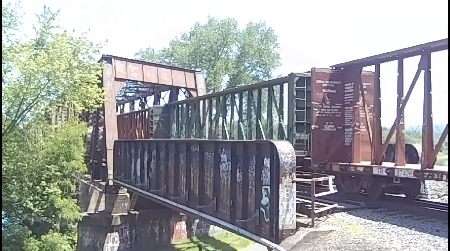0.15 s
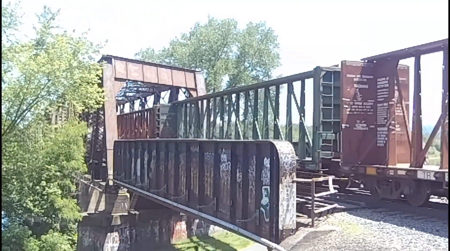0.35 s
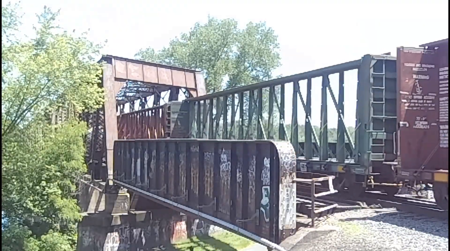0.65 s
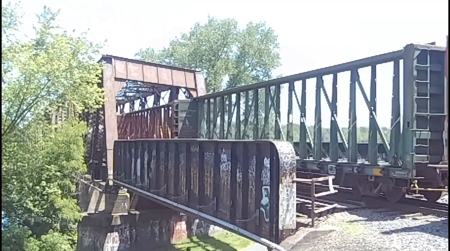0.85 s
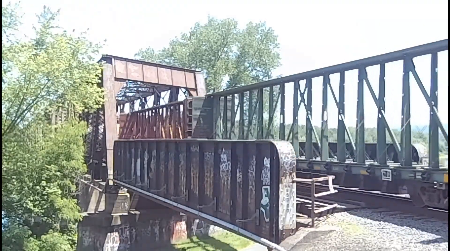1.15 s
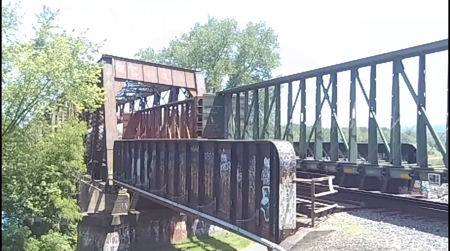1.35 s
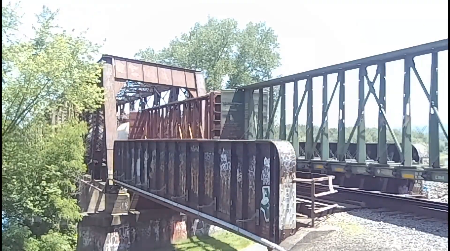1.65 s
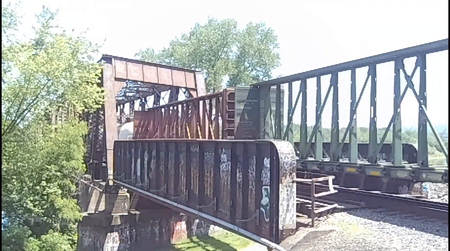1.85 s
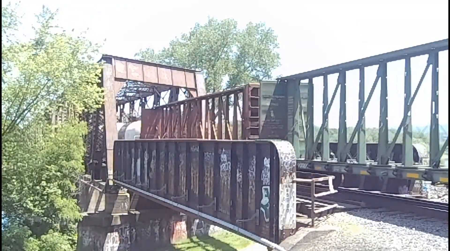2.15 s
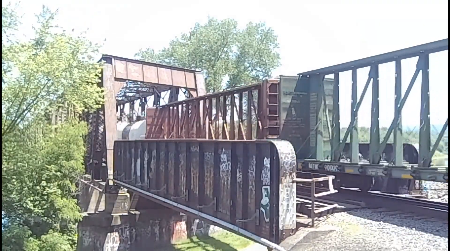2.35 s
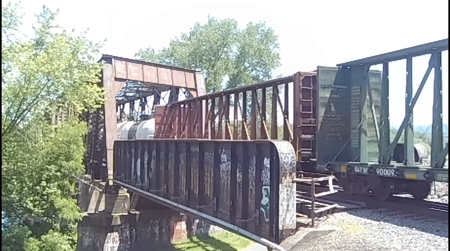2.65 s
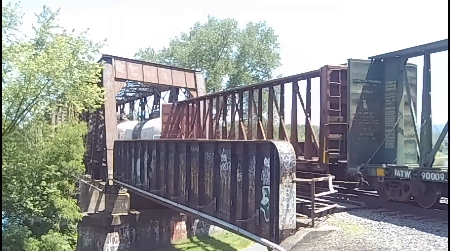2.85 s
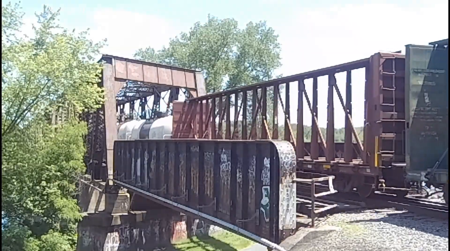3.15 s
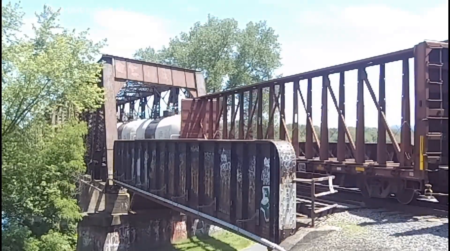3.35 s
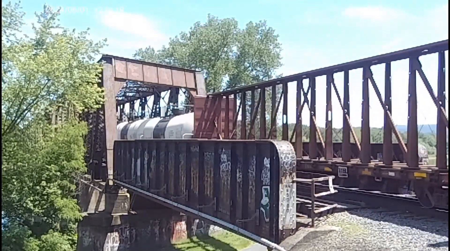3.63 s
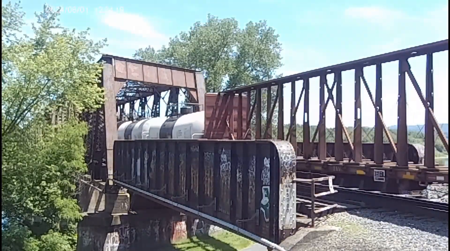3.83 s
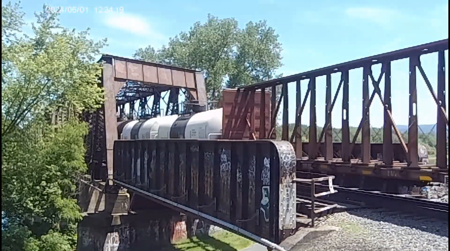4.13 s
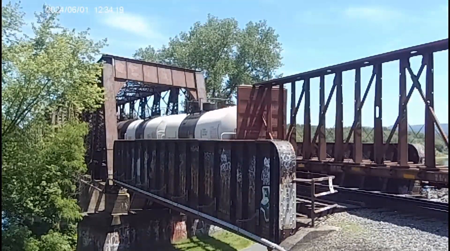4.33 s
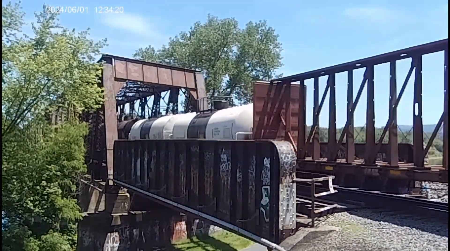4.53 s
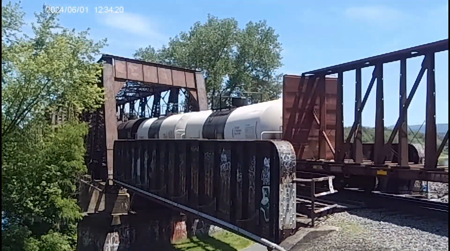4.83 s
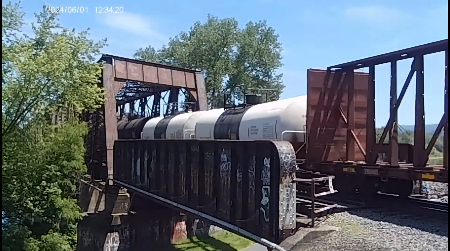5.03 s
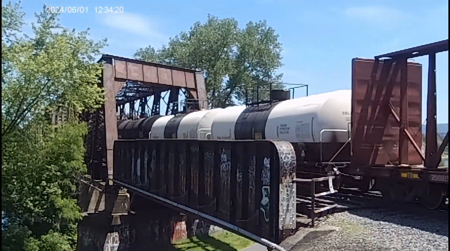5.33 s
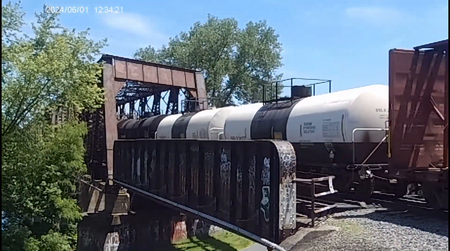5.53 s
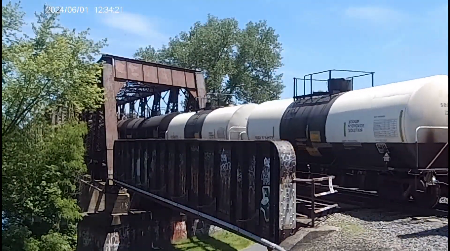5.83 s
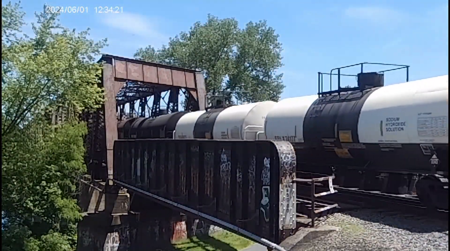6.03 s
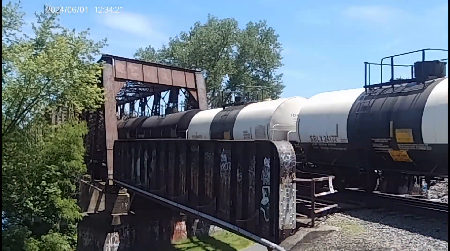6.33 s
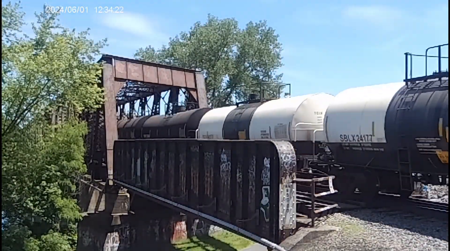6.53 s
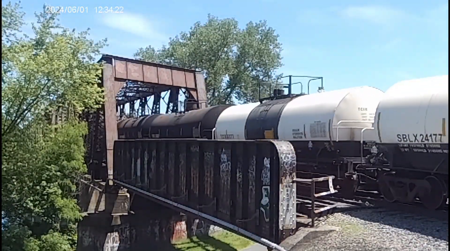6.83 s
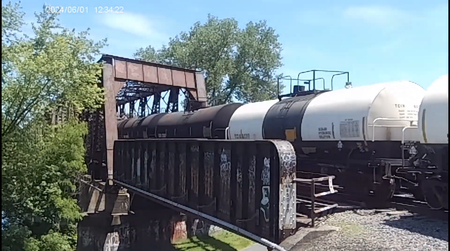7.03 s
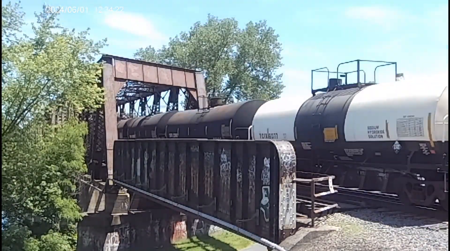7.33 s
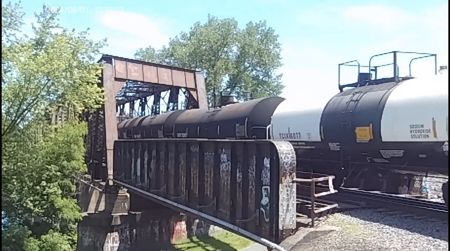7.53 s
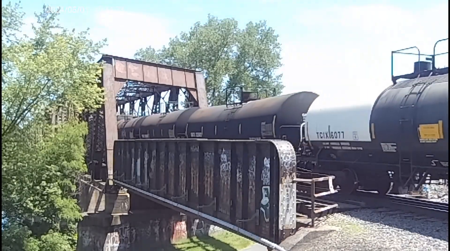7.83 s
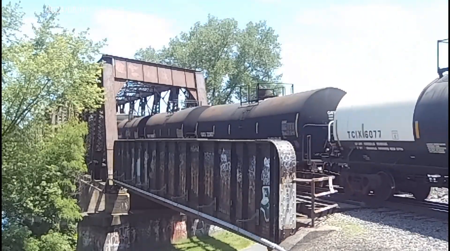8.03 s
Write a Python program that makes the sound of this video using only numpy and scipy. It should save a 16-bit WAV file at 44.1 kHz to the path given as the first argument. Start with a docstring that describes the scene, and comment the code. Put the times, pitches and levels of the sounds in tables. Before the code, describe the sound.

Beside the track outdoors, one microphone hears a long freight train cross a steel girder bridge at a steady pace. A continuous low boom and mid-low roar fill the sound, throbbing with each wheel turn. Hard clacks and deck thuds crowd together from about two and a half to four and a half seconds, then thin out. Faint scraping, short squeaks and loose metal clanks ride on top as the rumble eases.

```python
"""Freight train on a steel girder bridge

A train rolls at a steady pace across the span, heard from beside the track on one microphone.
Filtered noise makes the roar of rough wheels; slow swings boom in the girders and panels drone.
Short filtered blows knock in rail and deck, once a turn under wheels with flat spots.
Bogies lean on the rail: scrape and hiss swell, wheel modes sing and squeak; loose fittings clank."""
import sys
import numpy as np
from scipy import signal
from scipy.fft import rfft, irfft
from scipy.io import wavfile
from scipy.ndimage import uniform_filter1d, minimum_filter1d, map_coordinates

SR = 44100
rng = np.random.default_rng(int(sys.argv[2]) if len(sys.argv) > 2 else 0)


def to_wav(s):
    """Save 16-bit WAV."""
    ch = np.atleast_2d(s).T  # columns
    pcm = np.round(np.clip(ch, -1, 1) * 32767)  # PCM
    wavfile.write(sys.argv[1], SR, pcm.astype(np.int16))


N = 360738  # length in samples


def amp(db):
    """Gain of a level in dB."""
    return 10 ** (np.asarray(db) / 20)


def unit(x):
    """x at rms 1."""
    return x / np.sqrt(np.mean(x ** 2) + 1e-20)


def curves(rows):
    """One value per sample for each column after the time."""
    s, *cols = np.transpose(rows)
    return [np.interp(np.arange(N) / SR, s, c) for c in cols]


def wobble(rate):
    """A smooth random curve, rate knots a second."""
    knots = rng.standard_normal(int(N * rate / SR) + 4)
    return map_coordinates(knots, [np.arange(N) * rate / SR], mode="nearest")


def flutter(n, rate):
    """n samples of a tone's random swing in level and phase, rate knots a second; rms 1."""
    at = [np.arange(n) * rate / SR]
    real, imag = [map_coordinates(knots, at, mode="nearest") for knots in rng.standard_normal((2, 1000))]
    return (real + 1j * imag) / np.sqrt(np.mean(real ** 2 + imag ** 2))


def add(track, s, sound):
    """Mix a sound into a track from time s on."""
    start = int(np.clip(round(s * SR), 0, N))
    track[start:start + len(sound)] += sound[:N - start]


def body(spectrum, modes=(), size=8192):
    """Causal impulse response of energy 1: a broad spectrum with resonances standing on it."""
    hz = np.fft.rfftfreq(size, 1 / SR)
    f, level = np.transpose(spectrum)
    beyond_db = -60 * np.log10(np.maximum(hz / f[-1], 1))  # steep fall above the last row
    db = np.interp(np.log(hz + 1), np.log(f), level) + beyond_db
    for centre, width, lift in modes:
        db = db + lift / (1 + (2 * (hz - centre) / width) ** 2)
    # folding the cepstrum gives minimum phase: the response starts at once
    cepstrum = irfft(np.log(amp(db)))
    cepstrum[1:size // 2] *= 2
    cepstrum[size // 2 + 1:] = 0
    response = irfft(np.exp(rfft(cepstrum)))
    return response / np.linalg.norm(response)


def rolling(response, bumps_per_s, bump_share):
    """Fine roughness plus countless small bumps of the treads shake a body; rms 1."""
    n = N + len(response) - 1
    bumps = (rng.random(n) < bumps_per_s / SR) * rng.standard_normal(n)
    roughness = rng.standard_normal(n)
    return unit(signal.fftconvolve(bump_share * unit(bumps) + roughness, response, "valid"))


def steady(x, seconds):
    """Even out the swells of x that last longer than the given time."""
    size = max(int(seconds * SR), 2)
    power = uniform_filter1d(uniform_filter1d(x ** 2, size), size)
    return x / np.sqrt(np.abs(power) + 1e-9)


def patches(x, patchy_db, width_hz, seconds):
    """Wheel after wheel excites other resonances: the colour of x shifts in patches of this width and life."""
    z = signal.stft(x, nperseg=2048)[2]
    bins = max(width_hz * 2048 / SR, 1)
    frames = max(seconds * SR / 1024, 1)
    row, col = np.indices(z.shape)
    field = map_coordinates(rng.standard_normal(z.shape), [row / bins, col / frames], order=1)
    return unit(signal.istft(z * amp(patchy_db * unit(field)), nperseg=2048)[1][:N])


REBOUND_S, REBOUND_DB = .0065, -5  # typical delay and level of the second touch


def blow(response, t60, chatter_db, tail_db, tail_t60):
    """A hard contact and its rebound, brief chatter, then echo through the steelwork; rms 1 over 20 ms."""
    t = np.arange(SR // 3) / SR
    fade = np.exp(-np.log(1000) * t / t60)
    fade = fade + amp(tail_db) * np.exp(-np.log(1000) * t / tail_t60)
    rise = 1 - np.exp(-t / REBOUND_S)
    chatter = signal.fftconvolve(rise * fade * rng.standard_normal(len(t)), response)
    sound = amp(chatter_db) * chatter / np.linalg.norm(chatter)
    sound[:len(response)] += response
    rebound = int(REBOUND_S * SR * rng.uniform(.8, 1.3))
    sound[rebound:][:len(response)] += amp(REBOUND_DB) * response
    return sound / np.std(sound[:SR // 50])


# Deck and rails as cars pass the microphone. Each row: time in seconds, base level in dB of the
# deck rumble, base level in dB of the rail roar.
ROAR_LEVELS = [(0, -20, -26.5), (1, -16.5, -26.5), (2, -16, -25.5), (2.5, -14.5, -24.5), (2.75, -16, -22.5),
               (3.6, -15.5, -23), (4.4, -16.5, -24.5), (5.3, -18.5, -26.5), (5.8, -19, -27),
               (6.8, -20.5, -28), (7.5, -22, -28), (8.18, -24, -27)]
# Girders under the passing axles. Each row: time in seconds, base level of the boom in dB.
BOOM_LEVELS = [(0, -17), (0.7, -18), (1.3, -18.5), (1.65, -17.5), (2.5, -18.5), (2.75, -20.5), (4.1, -18),
               (4.7, -21), (5.9, -21), (6.4, -20.5), (8.18, -21.5)]
# Spectra of the girders, deck and rails. Each row: frequency in Hz, relative density in dB per Hz.
GIRDER_SPECTRUM = [(10, -24), (22, -15.5), (33, -10.5), (44, -4), (54, -1.5), (68, -4), (90, -6),
                   (115, -14), (200, -48.5)]
DECK_SPECTRUM = [(70, -29.5), (105, -5), (140, 0.5), (180, -0.7), (250, -3.5), (340, -5.5), (450, -6.5),
                 (560, -14.5), (900, -50)]
RAIL_SPECTRUM = [(250, -20.5), (400, -3), (480, 0), (640, -0.5), (740, 0), (900, -4), (1030, -9.5),
                 (1200, -16), (1400, -29), (1900, -33), (2600, -56.5)]
# Plate resonances. Each row: frequency in Hz, width in Hz, lift above the spectrum in dB.
PLATE_MODES = [(140, 47, 2.5), (291.7, 20, 2), (441.5, 7.3, 2), (566.5, 13, 2.5), (690, 20, 1)]
# out-of-round wheels: one turn, a moment of full load, swing of the rail roar either way
TURN_S, THROB_AT_S, THROB_DB = .288, 3.12, 1.5


def bridge():
    """Girders boom under axle load; deck and rails roar with wheel roughness and throb once a turn."""
    boom_db, deck_db, rail_db = curves(BOOM_LEVELS) + curves(ROAR_LEVELS)
    throb_db = THROB_DB * np.cos(2 * np.pi * (np.arange(N) / SR - THROB_AT_S) / TURN_S)
    dip_db = uniform_filter1d(lift_db(), size=256)

    boom = rolling(body(GIRDER_SPECTRUM), 60, bump_share=0.52)
    boom = amp(boom_db + 0.1 + 1.3 * wobble(16)) * steady(boom, seconds=0.064)

    deck = rolling(body(DECK_SPECTRUM, PLATE_MODES), 900, bump_share=0.25)
    deck = patches(deck, patchy_db=1.1, width_hz=30, seconds=.09)
    deck_db = deck_db + dip_db + 0.66 * throb_db + 0.4 * wobble(18)
    deck = amp(deck_db) * steady(deck, seconds=0.071)

    rail = rolling(body(RAIL_SPECTRUM, PLATE_MODES), 600, bump_share=0.3)
    rail = patches(rail, patchy_db=1.3, width_hz=61.7, seconds=.08)
    rail_db = rail_db + 0.56 + dip_db + throb_db + 0.53 * wobble(16)
    rail = amp(rail_db) * steady(rail, seconds=0.1)
    return boom + deck + rail


# Heavy bogies out on the span. Each row: middle in seconds, pitch in Hz, peak in dB before HEAVE_DB.
HEAVES = [(.06, 56.2, -13), (.34, 59.5, -9), (0.559, 58, -9.5), (.74, 56.5, -11), (0.911, 53.8, -12.5),
          (1.47, 54.8, -12.5), (1.8, 61.8, -8), (2.28, 50.4, -11), (2.37, 55, -10.5), (2.55, 55.5, -7),
          (4.04, 55.2, -15), (4.88, 46.7, -13.5), (5.67, 51.7, -13), (6.36, 57, -17), (6.649, 53.5, -11),
          (6.87, 51, -17), (7.26, 59.1, -11), (7.81, 47.8, -10), (8.02, 58.6, -18)]
HEAVE_S, HEAVE_DB = 0.161, -3.2  # whole length of a swing; level added to all swings


def heaves():
    """A heavy bogie bends a girder: it swings for a few cycles and settles."""
    track, t = np.zeros(N), np.arange(int(HEAVE_S * SR)) / SR
    for s, hz, db in HEAVES:
        swing = np.sin(2 * np.pi * (hz * t + rng.random()))
        add(track, s - HEAVE_S / 2, amp(db + HEAVE_DB) * np.hanning(len(t)) * swing)
    return track


# Steel panels that a passing car sets droning. Each row: middle in seconds, length in seconds
# between the half-height points of the swell, pitch in Hz, level in dB (rms before the swell shapes it).
DRONES = [(0.88, .3, 215, -21), (1.65, 0.51, 100, -21.5), (1.698, 0.38, 305, -20.5),
          (2.53, 0.29, 136.4, -18.5), (3.298, .4, 220.7, -19), (3.42, 0.52, 454, -24),
          (3.746, 0.28, 206.5, -23), (4.202, 0.36, 279, -23), (4.599, 0.37, 222, -21), (5.6, .5, 245, -25),
          (8.05, .4, 145, -24.5)]
DRONE_WIDTH_HZ = 40  # random knots a second, which broaden the tone


def drones():
    """Each car shakes other panels: a broad low resonance swells as it passes and fades."""
    track = np.zeros(N)
    for s, length, hz, db in DRONES:
        n = int(2 * length * SR)
        swing = flutter(n, DRONE_WIDTH_HZ) * np.exp(2j * np.pi * hz * np.arange(n) / SR)
        add(track, s - length, amp(db) * np.hanning(n) * unit(swing.real))
    return track


# Hard knocks, where a flat spot lands squarely or a wheel meets a joint. Each row: time in seconds,
# clack level in dB before CLACK_DB, clack pitch in Hz, thud level in dB before THUD_DB.
KNOCKS = [(0.194, -13.5, 717, -24.5), (0.287, -15.5, 742, -24), (0.777, -15, 676, -18.5),
          (1.059, -9, 806, -9), (1.149, -13, 625, -21), (1.531, -9, 944, -13), (1.64, -9, 834, -13),
          (1.712, -9.5, 743, -13), (1.819, -13, 700, -18), (1.879, -12, 710, -23), (2.116, -13, 755, -17),
          (2.253, -10.5, 777, -18), (2.398, -9.5, 756, -11), (2.5, -9.5, 727, -15), (2.784, -5.5, 753, -14),
          (2.819, -12, 710, -15), (2.89, -13, 783, -15), (2.98, -11, 700, -16), (3.031, -12, 763, -12.5),
          (3.059, -8, 856, -9.5), (3.106, -10, 760, -15), (3.277, -7, 740, -11.5), (3.461, -15.5, 680, -17),
          (3.571, -6.5, 853, -11.5), (3.651, -8.5, 710, -6.5), (3.768, -12.5, 716, -13),
          (3.868, -12, 726, -14.5), (4.008, -10, 874, -8), (4.072, -15.5, 696, -23),
          (4.164, -14, 850, -19.5), (4.244, -9.5, 600, -8.5), (4.3, -13, 640, -8.5),
          (4.578, -12, 840, -8.5), (4.754, -20, 703, -22), (5.106, -17.5, 725, -25), (5.433, -11, 732, -20),
          (5.486, -20, 746, -19), (6.011, -18, 740, -23), (6.775, -17.5, 640, -25), (7.468, -11, 817, -25),
          (7.763, -19, 757, -19)]
# Spectra of struck rail and thudding deck. Each row: frequency in Hz, relative density in dB per Hz.
KNOCK_SPECTRUM = [(200, -27), (500, 2.5), (750, 5), (950, -1), (1150, -10.5), (1400, -21), (1650, -16),
                  (2100, -31.5), (3300, -41.5), (5000, -59.5), (10000, -81)]
THUD_SPECTRUM = [(50, -11.5), (130, -9), (300, 0.5), (480, 2.5), (800, -17.5), (2000, -67)]
# Struck-rail resonances, before the pitch of each blow scales them. Each row: frequency in Hz,
# width in Hz, lift above the spectrum in dB.
RAIL_MODES = [(596, 48, 3.5), (810, 45, 6), (890, 90, 5)]
CLATTER_HZ, CLATTER_WIDTH_HZ = 1450, 980  # band in which the steelwork clatters after a hard blow
CLATTER_FROM_DB, CLATTER_GROWS = -13.5, 0.53  # clack level where it starts; dB of lift per dB above
CLACK_DB, THUD_DB = -9, -6  # levels added to all clacks in the rail and all thuds in the deck


def knocks():
    """Each blow clacks in the rail, pitched by where it lands and brighter when hard, and thuds in the deck."""
    track, deck = np.zeros(N), body(THUD_SPECTRUM, PLATE_MODES)
    for s, db, clack_hz, thud_db in list(KNOCKS) + flat_blows():
        place = clack_hz / RAIL_MODES[1][0]
        clatter = (CLATTER_HZ, CLATTER_WIDTH_HZ, CLATTER_GROWS * max(db - CLATTER_FROM_DB, 0))
        modes = [clatter] + [(hz * place, width, lift) for hz, width, lift in RAIL_MODES]
        rail = body(KNOCK_SPECTRUM, modes)
        clack = blow(rail, t60=0.18, chatter_db=1.0, tail_db=-13.0, tail_t60=0.23)
        thud = blow(deck, t60=0.14, chatter_db=0.5, tail_db=-12.0, tail_t60=0.3)
        add(track, s, amp(db + CLACK_DB) * clack)
        add(track, s, amp(thud_db + THUD_DB) * thud)
    return track


# Wheels with a flat spot. Each row: nearest blow in seconds, seconds per turn, clack level in dB
# there, before scatter and CLACK_DB.
FLAT_WHEELS = [(2.203, .288, -18.5), (2.982, .2929, -18), (3.422, .2875, -18.5), (4.275, .2935, -18.5),
               (6.526, .2875, -29.5)]
SPEED_M_PER_S, DISTANCE_M, SOUND_M_PER_S = 10, 20, 343  # train; microphone to track; sound in air
FLAT_FADE_DB_PER_M, FLAT_SCATTER_DB = 0.1, 1.2  # loss along the track; change from turn to turn
FLAT_HZ, FLAT_THUD_DB = 771, -2  # typical clack pitch; thud against clack, before the overall levels


def flat_blows(count=8):
    """Knock rows for the turns of each flat spot: later and fainter the farther along the track."""
    turns = np.arange(-count, count + 1)
    hard_s = np.array(KNOCKS)[:, 0]
    blows = []
    for s, turn_s, db in FLAT_WHEELS:
        along_m = SPEED_M_PER_S * turn_s * turns
        delay_s = (np.hypot(DISTANCE_M, along_m) - DISTANCE_M) / SOUND_M_PER_S
        scatter_db = FLAT_SCATTER_DB * rng.standard_normal(len(turns))
        level_db = db - FLAT_FADE_DB_PER_M * np.abs(along_m) + scatter_db
        clack_hz = FLAT_HZ * amp(0.74 * rng.standard_normal(len(turns)))
        blows += zip(s + turn_s * turns + delay_s, level_db, clack_hz, level_db + FLAT_THUD_DB)
    # a hard knock within 35 ms takes the place of the lighter one
    return [row for row in blows if 0 < row[0] < N / SR and np.abs(hard_s - row[0]).min() > .035]


LIFT_S, LIFT_DB = .025, 2.5  # length and depth of one dip, before smoothing


def lift_db():
    """The wheel is unloaded just before each hard knock, so the roar dips briefly."""
    t = np.arange(N) / SR
    return -LIFT_DB * sum(np.abs(t - (s - LIFT_S / 2)) < LIFT_S / 2 for s, *_ in KNOCKS)


# Treble of steel on steel. Each row: time in seconds, base level of the fine hiss in dB.
HISS_LEVELS = [(0, -81), (1.2, -77.5), (2.3, -72.5), (3.5, -76), (4.2, -71), (4.9, -76.5), (7.5, -81.5),
               (8.1, -74)]
# Spectra of wheel discs, scraping flanges and fine hiss. Each row: frequency in Hz, relative
# density in dB per Hz.
WEB_SPECTRUM = [(900, -32.5), (1300, -5.5), (1560, -3), (1800, -7), (1950, -13.5), (2150, -27),
                (3000, -40.5)]
SCRAPE_SPECTRUM = [(1600, -20.5), (2100, -9.5), (2650, 2.5), (2900, -2.5), (3350, -2), (3700, -8),
                   (4300, -17), (5100, -32), (6000, -40), (9000, -58.5)]
SIZZLE_SPECTRUM = [(3000, -10.5), (5000, -2), (5800, -6), (6400, 5), (7100, 0), (7800, 3.5), (9200, -3.5),
                   (10200, -16), (15000, -23)]
# Wheel-disc resonances. Each row: frequency in Hz, width in Hz, lift above the spectrum in dB.
WHEEL_MODES = [(1553, 100, 4.8), (2300, 21, 1), (3217, 120, 5.1), (3420, 160, 2.7), (4660, 210, 6.1),
               (5030, 230, 9.7), (6570, 320, 8.6), (7300, 300, 5.3)]
SCRAPE_DB, RING_DB = -56, -43.5  # base levels of flanges and wheel discs when running free
HISS_FOLLOWS, HISS_FLICKER_DB = 0.49, 1.5  # share of a rub's scrape rise; quick unevenness


def wheels():
    """Wheel discs ring in their modes while flanges scrape and hiss along the rail; rubs change all three."""
    scrape_db, ring_db = rub_db()
    hiss_db, = curves(HISS_LEVELS)
    ring = rolling(body(WEB_SPECTRUM, WHEEL_MODES), 600, bump_share=0.62)
    ring = patches(ring, patchy_db=3.0, width_hz=90.2, seconds=.08)
    scrape = rolling(body(SCRAPE_SPECTRUM, WHEEL_MODES), 600, bump_share=0.39)
    scrape = patches(scrape, patchy_db=3.5, width_hz=80, seconds=.08)
    hiss = rolling(body(SIZZLE_SPECTRUM), 600, bump_share=.3)
    hiss = patches(hiss, patchy_db=4.5, width_hz=92, seconds=0.065)
    hiss_db = hiss_db + HISS_FOLLOWS * scrape_db + HISS_FLICKER_DB * wobble(45)
    pressure_db = 1.4 * wobble(17)  # the wheelsets hunt from side to side
    mix = amp(RING_DB + ring_db) * ring + amp(SCRAPE_DB + scrape_db) * scrape + amp(hiss_db) * hiss
    return amp(pressure_db) * mix


# Bogies leaning on the rail. Each row: middle in seconds, length in seconds between the half-height
# points, rise of the scrape in dB, rise of the wheel ring in dB (negative where it falls).
RUBS = [(0.35, 0.18, 1.5, 2.5), (1.051, 0.24, 3, 4.5), (1.502, 0.19, 0.5, 3), (2.247, 0.53, 3.5, -1.5),
        (2.93, 0.4, 5, 3), (3.614, 0.25, 1.5, 2), (3.99, 0.53, 4, 2), (4.6, 0.39, 2, -1),
        (5.28, 0.31, 2.5, 1), (6.433, 0.28, 4, 2.5), (7.098, 0.57, 2, 0), (7.96, 0.69, 2, 3)]


def rub_db():
    """Rise of the scrape and of the wheel ring in dB: each leaning bogie swells and lets go."""
    t = np.arange(N) / SR
    return sum(np.outer([scrape_db, ring_db], np.exp(-np.log(2) * (2 * (t - s) / length) ** 2))
               for s, length, scrape_db, ring_db in RUBS)


# Modes that the flanges keep singing. Each row: central pitch in Hz, level in dB before SINGING_DB.
SINGING_MODES = [(1545, -1.5), (1610, -2.5), (2205, -11), (2345, -12), (2620, -11.5), (3060, -11.5),
                 (3300, -13), (3920, -20), (4150, -21), (4470, -21), (5040, -22.5), (5200, -23.5),
                 (5430, -30), (5690, -28.5), (6130, -26)]
SINGING_DB, SINGING_FOLLOWS = -53, 0.31  # level added when running free; share of a rub's scrape rise


def singing():
    """Rubbing feeds each wheel mode on its own: it swells, wanders in pitch from wheel to wheel and dies away."""
    track = np.zeros(N)
    for hz, db in SINGING_MODES:
        pitch_hz = hz * (1 + .007 * wobble(7)) + 32 * wobble(160)
        phase = 2 * np.pi * np.cumsum(pitch_hz) / SR
        swell_db = 5 * np.clip(wobble(13), -2, 1) + 4.4 * wobble(90) + 2.8 * np.clip(wobble(2.7), -2, 1)
        track += amp(db) * unit(amp(swell_db)) * np.sin(phase)
    return amp(SINGING_DB + SINGING_FOLLOWS * rub_db()[0]) * track


# Flange squeaks. Each row: middle in seconds, half of the whole span in seconds, pitch in Hz at the
# middle, level in dB, roughness from 0 to 1.
SQUEAKS = [(0.35, .04, 3015, -47, .6), (0.426, .045, 2410, -44, .7), (0.58, 0.099, 5020, -62.5, .5),
           (0.831, 0.086, 5430, -62, .3), (1.152, .11, 4200, -62, .5), (1.489, 0.12, 3050, -48, .6),
           (1.507, 0.087, 4560, -56.5, .4), (1.743, 0.48, 3340, -51.5, .4), (2.27, .32, 3340, -50.5, .15),
           (2.54, .06, 4900, -63, .6), (2.658, .42, 5060, -61.5, 0), (2.702, 0.064, 2200, -47, .7),
           (3.015, 0.1, 1616, -39, .6), (3.099, 0.097, 1650, -34.5, .6), (3.286, 0.1, 5448, -59.5, .3),
           (3.993, .12, 3370, -47.5, .4), (4.645, 0.14, 2230, -47, .6), (5.239, .086, 1350, -37, .5),
           (5.253, 0.094, 2760, -51, .4), (5.28, .05, 12280, -70, .1), (5.366, 0.064, 2480, -45, .5),
           (5.899, 0.057, 1583, -35, .5), (6.352, 0.058, 3240, -43.5, .2), (6.416, .1, 4480, -62, .6),
           (6.488, .035, 1560, -30.5, .3), (6.849, 0.43, 2350, -53.5, .4), (7.781, 0.2, 3120, -51, .7),
           (7.872, .12, 1920, -45, .7), (7.987, .035, 1550, -32, .4)]
WAVER_HZ, SAG_HZ_PER_S = 16, 70  # unsteadiness of the pitch (rms); its fall as the wheel goes by
SLIP_HZ = 172  # random knots a second at which a rough squeak catches and slips


def squeaks():
    """A flange sticks and slips: one wheel mode swells and fades, unsteady in pitch and broken up by the slips."""
    track = np.zeros(N)
    for s, length, hz, db, rough in SQUEAKS:
        n, rough = int(2 * length * SR), np.clip(rough, 0, 1)
        noise = rng.standard_normal(2 * SR)
        waver = unit(uniform_filter1d(uniform_filter1d(noise, size=120), size=60))[:n]
        sag_hz = SAG_HZ_PER_S * (np.arange(n) / SR - length)
        phase = 2 * np.pi * np.cumsum(hz + WAVER_HZ * waver - sag_hz) / SR
        grip = np.sqrt(1 - rough) + np.sqrt(rough) * flutter(n, SLIP_HZ)
        tone = np.real(grip * np.exp(1j * phase))
        add(track, s - length, amp(db) * np.hanning(n) ** 2 * tone)
    return track


# Couplers and loose fittings. Each row: time in seconds, level in dB before CLANK_DB and the soft
# rise, ring in Hz, lift of the ring over the rattle in dB, time constant of the rise in seconds.
CLANKS = [(0.2034, -37, 2300, 6, .005), (0.3436, -38.5, 3000, 4, 0.0068), (1.4311, -41, 3070, 5, 0.0067),
          (1.4862, -36, 3030, 3, .007), (1.5495, -37.5, 3380, 5, .007), (2.14, -38, 3280, 8, .007),
          (2.398, -34.5, 3340, -0.5, 0.0032), (3.2775, -40, 2410, -1, .003), (4.0136, -36, 2730, 5, .007),
          (4.17, -40.5, 2110, 6, 0.0057), (4.542, -33, 3170, 5, 0.0089), (4.597, -36, 2510, 4, 0.012),
          (6.414, -33.5, 3350, 5, 0.0081), (6.477, -30.5, 3250, 4, 0.014),
          (6.927, -41.5, 3330, 6.5, 0.0062), (7.1613, -41, 3280, 2, .007), (7.922, -36.5, 2500, 5, .012),
          (7.969, -31.5, 4700, 5, .014)]
# Rattle of a fitting. Each row: frequency in Hz, relative density in dB per Hz.
FITTING_SPECTRUM = [(600, -3), (1550, 16.5), (2100, 1.5), (2700, -3), (3300, 3.5), (4000, -12.5),
                    (5000, -18.5), (6000, -26), (9000, -34.5), (11000, -51.5)]
CLANK_DB = -1  # level added to all clanks


def clanks():
    """Loose steel fittings rattle, each ringing in one main mode and a few others of its own."""
    track = np.zeros(N)
    for s, db, ring_hz, ring_db, rise_s in CLANKS:
        own_modes = [(ring_hz, 260, ring_db)] + [(hz, 90, 4) for hz in rng.uniform(2400, 5500, size=6)]
        fitting = body(FITTING_SPECTRUM, own_modes)
        sound = blow(fitting, t60=0.1, chatter_db=15.5, tail_db=-19.0, tail_t60=0.18)
        rise = 1 - np.exp(-np.arange(len(sound)) / SR / rise_s)
        add(track, s - .003, amp(db + CLANK_DB) * rise * sound)
    return track


def air():
    """A faint even hiss: white noise at a constant level."""
    return amp(-82.0) * rng.standard_normal(N)


def scene():
    """The whole train on the bridge over a faint even hiss, in one channel."""
    structure = bridge() + heaves() + drones()
    contact = knocks() + wheels() + singing() + squeaks()
    return (structure + contact + clanks() + air())[None]


TOP_HZ = 15500  # corner of the steep treble cut


def record(dry):
    """The sound fades in over 5 ms, the highest peaks are turned down and the top treble is cut steeply."""
    ceiling = .9
    opening = np.minimum(1, np.arange(N) / SR / .005)
    needed = np.minimum(1, ceiling / (np.abs(dry) + 1e-9))
    gain = minimum_filter1d(needed, size=601)  # reaches to both sides of each peak
    gain = uniform_filter1d(uniform_filter1d(gain, size=300), size=300)
    treble_cut = signal.butter(12, TOP_HZ, fs=SR, output="sos")
    return signal.sosfilt(treble_cut, dry * gain * opening)


dry = scene()
out = record(dry)
to_wav(out)
```